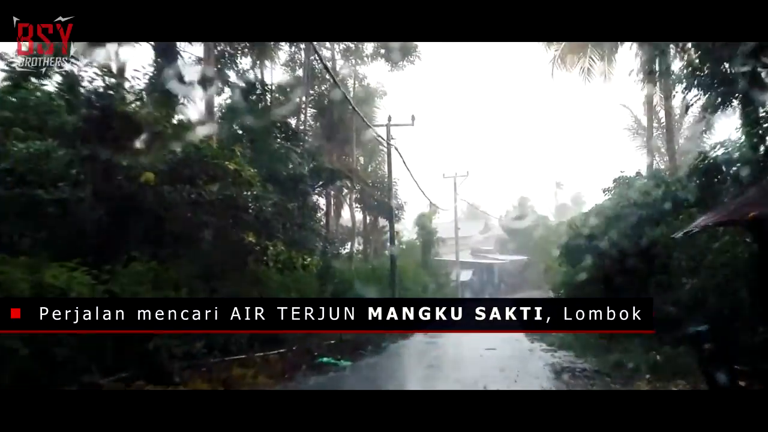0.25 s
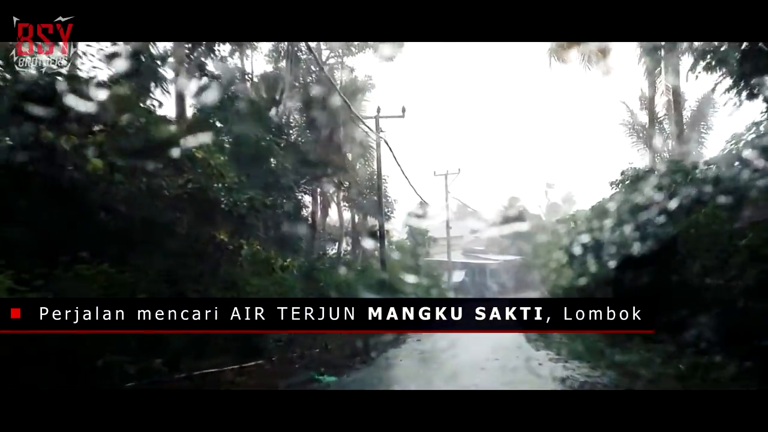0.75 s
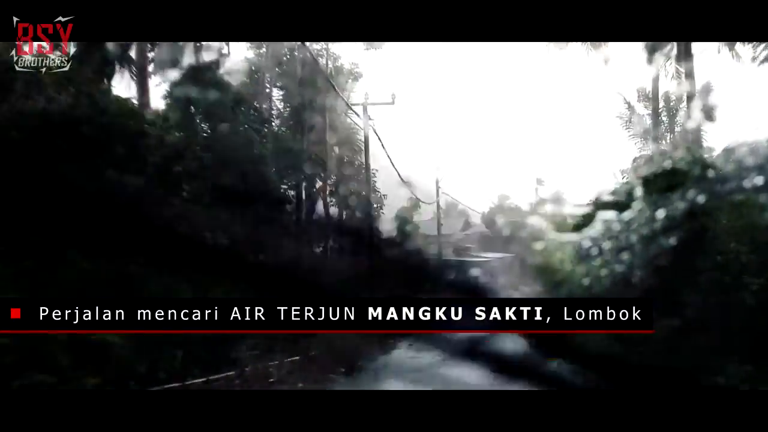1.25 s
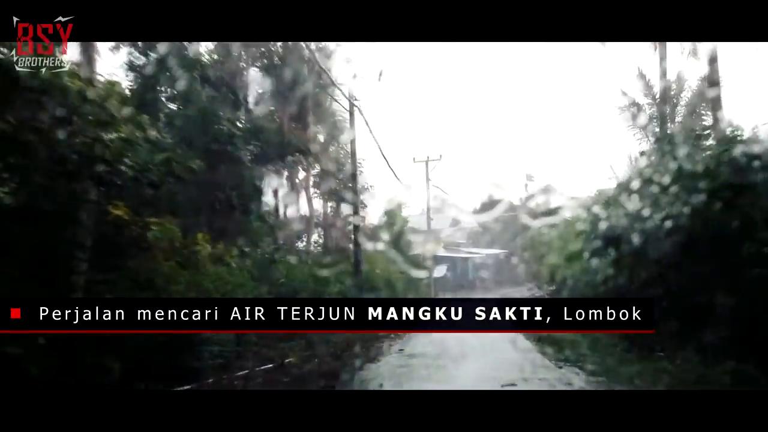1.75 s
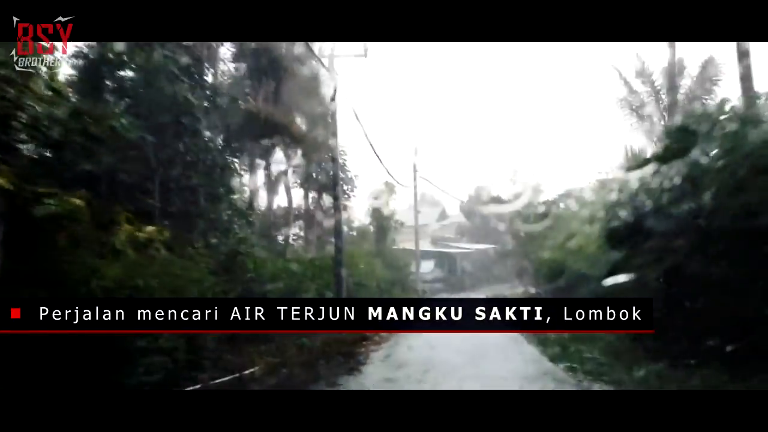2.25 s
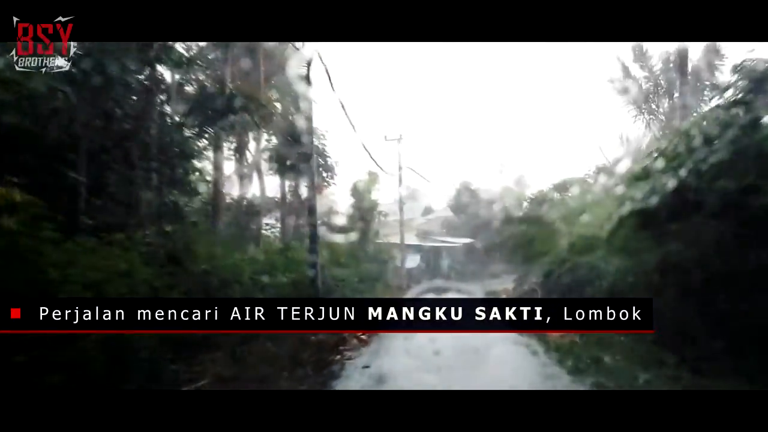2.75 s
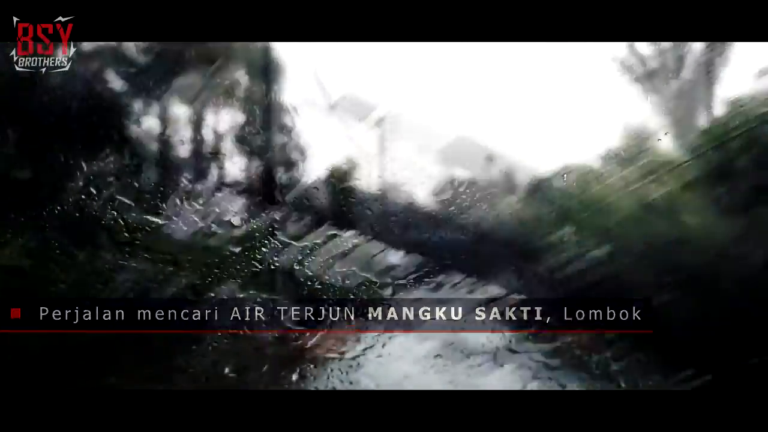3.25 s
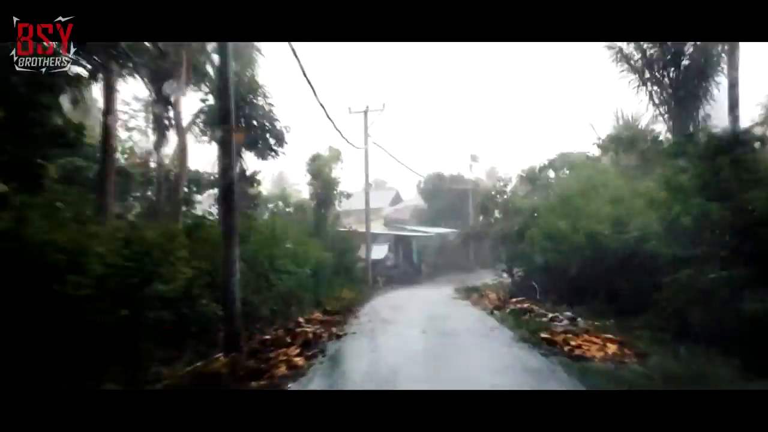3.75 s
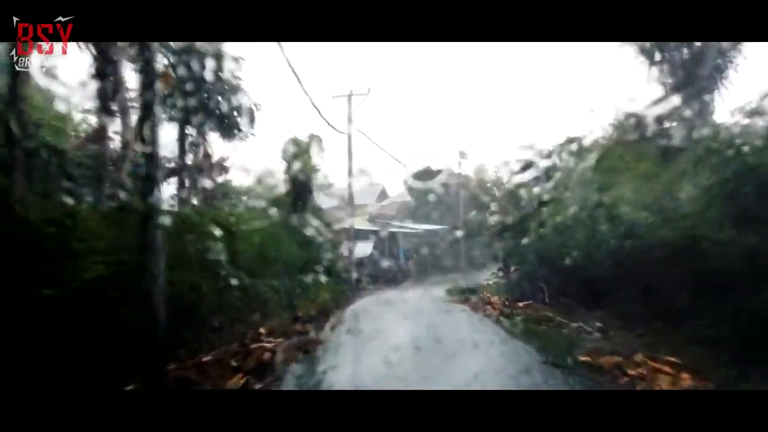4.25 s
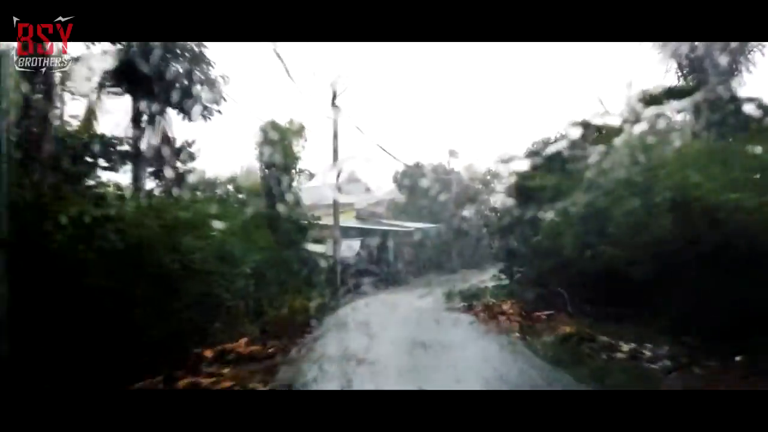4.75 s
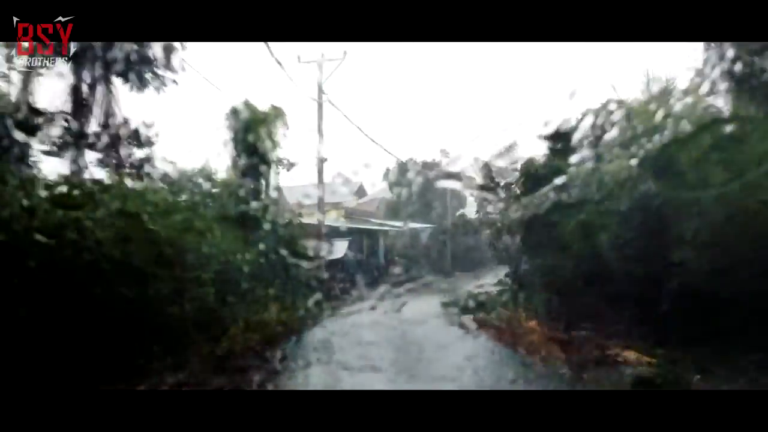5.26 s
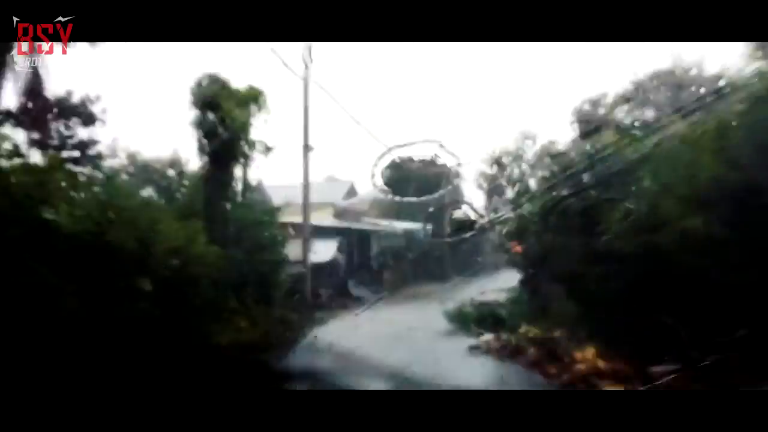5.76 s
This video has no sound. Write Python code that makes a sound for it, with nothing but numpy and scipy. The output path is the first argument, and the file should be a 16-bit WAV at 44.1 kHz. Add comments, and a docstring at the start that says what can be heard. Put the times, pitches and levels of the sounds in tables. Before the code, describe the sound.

Heavy rain patters on a slowly moving car's windshield and roof, heard from inside over road rumble, engine hum and thudding wipers.

```python
"""Slow drive in heavy rain

Inside a small car on a wet lane, countless drops patter on the windshield and roof. They thin out
under a tree, which sheds a few fat drips. The bumpy road rumbles through the body, the engine
pulls and eases off, and the wipers thud at each turn."""
import sys
import numpy as np
from scipy import signal
from scipy.fft import rfft, irfft
from scipy.io import wavfile
from scipy.ndimage import uniform_filter1d

SR = 44100
rng = np.random.default_rng(int(sys.argv[2]) if len(sys.argv) > 2 else 0)


def dump(signal):
    """Clip the signal to [-1, 1] and save it as 16-bit WAV at the path in sys.argv[1]."""
    limited = np.clip(np.atleast_2d(signal).T, -1, 1)
    pcm = np.round(limited * 32767).astype(np.int16)
    wavfile.write(sys.argv[1], SR, pcm)


N = 264820
TIME = np.arange(N) / SR
FREQS = np.fft.rfftfreq(N, 1 / SR)


def amp(db):
    """Turns decibels into a number to multiply by."""
    return 10 ** (np.asarray(db) / 20)


def unit(x):
    """Scales a signal to an average strength (rms) of 1."""
    return x / np.sqrt(np.mean(x ** 2) + 1e-20)


def at_pitch(points, hz):
    """Reads a table at the given frequencies, on a scale of octaves."""
    f, value = np.transpose(points)
    return np.interp(np.log(hz + 1), np.log(f), value)


def in_time(rows):
    """Turns each column after the time into a curve with a value for every sample."""
    s, *columns = np.transpose(rows)
    return [np.interp(TIME, s, column) for column in columns]


def swell(s, half_length):
    """A bell-shaped rise and fall around time s."""
    return np.exp(-.5 * ((TIME - s) / half_length) ** 2)


def hump(centre_hz, octaves):
    """A bell shape that picks out the frequencies around one pitch."""
    return np.exp(-.5 * (np.log2((FREQS + 1) / centre_hz) / octaves) ** 2)


def drift(hz):
    """A smooth random wander, up to about hz wiggles a second."""
    slow = np.exp(-(FREQS / hz) ** 2) * (FREQS > 0)
    return unit(irfft(rfft(rng.standard_normal(N)) * slow, N))


def add(mix, s, sound):
    """Mixes a sound in at time s."""
    part = mix[:, max(round(s * SR), 0):][:, :sound.shape[1]]
    part += sound[:, :part.shape[1]]


def ring(x, tone_db):
    """Gives a sound the tone of a panel, so that each click rings briefly."""
    cepstrum = irfft(np.log(amp(np.maximum(tone_db, -100))), N)
    # folding this in half makes the ring come after the click, never before
    cepstrum[..., 1:N // 2] *= 2
    cepstrum[..., N // 2 + 1:] = 0
    return irfft(rfft(x) * np.exp(rfft(cepstrum)), N)


# how alike left and right sound: f/Hz, likeness (1 = the same, 0 = unrelated, -1 = opposite)
SIDE_LIKENESS = [(35, .9995), (80, .997), (130, .988), (190, .972), (300, .86), (430, .1), (570, .72),
                 (800, -.21), (960, .14), (1250, -.23), (1600, -.47), (1900, .23), (2500, .24),
                 (3000, -.29), (3700, 0)]
def cabin(pair):
    """Blends two signals: long waves reach both sides alike, shorter ones stand across the cabin."""
    angle = np.arcsin(np.clip(at_pitch(SIDE_LIKENESS, FREQS), -1, 1)) / 2
    spectra = rfft(pair)
    return irfft(np.cos(angle) * spectra + np.sin(angle) * spectra[::-1], N)


def cabin_noise(tone):
    """Steady noise that fills the cabin with the given tone."""
    return unit(ring(cabin(rng.standard_normal((2, N))), at_pitch(tone, FREQS)))


# how hard it rains: t/s, level/dB
SHOWER = [(0, -37.5), (.8, -37), (1.6, -37), (2.1, -35), (2.75, -34.5), (3.1, -35.5), (3.6, -34.5),
          (4.28, -35), (4.5, -33), (4.9, -33.5), (5.25, -31.5), (5.7, -34), (6, -36)]
# trees that shelter the passing car: t/s, rain held off/dB, half length/s
SHELTER = [(0.018, 1.3, 0.11), (3.83, 7.6, 0.088), (4.1, 5, 0.042), (4.2, 2, .04), (4.27, 2, .018),
           (6.0, 2, 0.082)]
def rain_level():
    """The rain that reaches the car, in dB: the shower less what the trees hold off."""
    shower_db, = in_time(SHOWER)
    return shower_db - sum(db * swell(s, half_length) for s, db, half_length in SHELTER)


def rain_change():
    """How far the rain is above or below its average, in dB."""
    rain_db = rain_level()
    return rain_db - rain_db.mean()


def impacts(per_s, spread_db, largest):
    """Drops land at random as single clicks: many small ones and a few large."""
    size = amp(spread_db * np.minimum(rng.exponential(1, (2, N)), largest))
    sign = rng.choice([-1, 1], (2, N))
    lands = rng.random((2, N)) < per_s / SR
    return size * sign * lands


def shimmer(x, depth_db, bins, frames=7):
    """Makes the tone flicker, most in the treble, in random patches `bins` high and `frames` long."""
    window = dict(fs=SR, nperseg=1024, noverlap=768)
    hz, _, spectra = signal.stft(x, **window)
    patches = uniform_filter1d(rng.standard_normal(spectra.shape[1:]), bins, axis=0)
    patches = unit(uniform_filter1d(patches, frames, axis=1))
    treble = at_pitch([(1000, 0.54), (9000, 0.69)], hz)[:, None]
    flicker = amp(depth_db * treble * np.minimum(patches, 1))
    return signal.istft(spectra * flicker, **window)[1][:, :N]


# how much louder the rain is on the left: f/Hz, left minus right/dB
RAIN_BALANCE = [(300, 0), (580, -1.5), (710, -6), (850, 0), (1300, -1), (1500, -1.5), (2300, -0.5),
                (3100, -3), (4300, -.5), (7000, -4), (8200, -1.5), (9500, 5), (12000, -1), (15300, -8.5)]
def panel(tone, ripple_db=1.1, spacing_hz=70):
    """A panel's tone in dB, left and right, made uneven by the many notes it can ring at."""
    notes_hz = np.arange(400) * spacing_hz
    ripple = np.array([np.interp(FREQS, notes_hz, side) for side in rng.standard_normal((2, 400))])
    ripple *= ripple_db * hump(2800, octaves=0.9)  # higher notes overlap and even out
    balance = np.outer([.5, -.5], at_pitch(RAIN_BALANCE, FREQS))
    return at_pitch(tone, FREQS) + balance + ripple


# tone of rain on glass: f/Hz, level/dB
GLASS_TONE = [(300, -9.5), (900, -12.5), (1400, 3), (2000, -1.5), (3000, 0), (4200, -1), (5200, -5),
              (7200, -2.5), (8300, -4.5), (9300, -6), (10500, -12), (12000, -16.5), (13500, -16),
              (15500, -15)]
def windshield(drops_per_s=5000, wash_db=-6, level_db=3.5, sizzle=0.14, band_count=14):
    """Each drop ticks in its own range of pitch; echoes and tiny drops merge into a wash."""
    bands = np.array([hump(hz, octaves=1) for hz in np.geomspace(1000, 14000, band_count)]) + 1e-9
    bands /= np.linalg.norm(bands, axis=0)  # together they cover all pitches evenly
    per_band = drops_per_s / band_count
    tick_spectrum = sum(band * rfft(impacts(per_band, spread_db=.5, largest=5.1)) for band in bands)
    patter = unit(irfft(tick_spectrum, N)) + amp(wash_db) * rng.standard_normal((2, N))
    patter = shimmer(patter, depth_db=6, bins=6)
    patter = shimmer(patter, depth_db=1.5, bins=110)
    patter = unit(ring(cabin(patter), panel(GLASS_TONE)))
    fizz = irfft(rfft(patter) * hump(6000, octaves=0.8), N)
    patter += np.tanh(sizzle * rain_change() / 2) * fizz / 2  # harder rain splashes brighter
    return amp(rain_level() + level_db) * patter


# tone of larger drops on glass: f/Hz, level/dB
TAP_TONE = [(250, -5), (700, 0), (1020, 2), (1230, -6), (1400, -4.5), (2000, -1.5), (3500, -0.5),
            (9000, -16.5), (13000, -25)]
def taps(drops_per_s=130, ring_s=0.002, level_db=-6.5, spot_count=12):
    """Larger drops stand out of the patter; each spot of glass they hit rings in its own way."""
    t = TIME[:SR // 50]
    spots = rng.standard_normal((spot_count, 2, len(t))) * np.exp(-t / ring_s)
    hits = np.zeros((2, N))
    for spot in spots:
        drops = impacts(drops_per_s / spot_count, spread_db=1.5, largest=2.9)
        hits += signal.oaconvolve(drops, spot, axes=1)[:, :N]
    return amp(rain_level() + level_db) * unit(ring(cabin(hits), at_pitch(TAP_TONE, FREQS)))


# tone of rain on the roof: f/Hz, level/dB
ROOF_TONE = [(120, -1), (230, 4.5), (330, 1), (390, 3), (440, 3), (580, 2.5), (650, 2), (720, 4),
             (820, -0.5), (1020, 1), (1230, -8.5), (1500, -6.5), (2200, -12), (5000, -37)]
def roof(drops_per_s=2200, level_db=-34, rain_share=0.63):
    """Drops drum on the sheet metal, dulled by the roof lining."""
    drops = impacts(drops_per_s, spread_db=3, largest=2.7)
    drumming = unit(ring(cabin(drops), panel(ROOF_TONE)))
    return amp(level_db + rain_share * rain_change()) * drumming


# tone of the shaking car body: f/Hz, level/dB
RUMBLE_TONE = [(10, -35), (19, -11), (27, 2.5), (38, 0), (51, 4.5), (62, -0.5), (75, -4), (97, -7),
               (125, -15.5), (200, -21), (450, -45), (1200, -87)]
# tone of the rolling tyres: f/Hz, level/dB
TYRE_TONE = [(70, -29), (110, -2), (150, -2), (195, 0), (225, -1), (245, -2), (265, -4), (300, -6.5),
             (350, -15), (500, -27.5), (1200, -45)]
def road(rise_db_per_s=0.9, rain_share=0.48):
    """The lane grows rougher and shakes the car; the tyres roar, more on bumps and where it is wet."""
    rumble_db = -28 + rise_db_per_s * TIME
    tyres_db = -34.5 + rain_share * rain_change()
    for s, extra_rumble_db, extra_tyres_db, _, _ in LANE_BUMPS:  # listed above jolts()
        bump = swell(s, BUMP_HALF_S)
        rumble_db += extra_rumble_db * bump
        tyres_db += extra_tyres_db * bump
    rumble = amp(rumble_db) * cabin_noise(RUMBLE_TONE)
    tyres = amp(tyres_db) * cabin_noise(TYRE_TONE)
    return rumble + tyres * amp([[-.4], [.4]])  # a little louder on the right


# the engine pulls, eases off and rolls on: t/s, firing rate/Hz, level/dB
ENGINE_RUN = [(0, 61.5, -41), (.7, 64.93, -38), (.98, 70, -34), (1.18, 74.5, -28), (1.57, 79.6, -34),
              (1.8, 82.5, -34.5), (1.87, 83.3, -30.5), (1.98, 85, -32), (2.03, 87.5, -39),
              (2.35, 93.4, -33.5), (2.8, 98, -35), (3.0, 88, -39), (3.08, 83.5, -35), (3.17, 80, -29),
              (3.27, 75, -37), (3.7, 70.9, -32), (4.3, 71, -34), (4.6, 71.4, -37), (5.15, 74.35, -44),
              (6, 70.6, -46)]
# the notes in its hum: multiple of the firing rate, level/dB
HARMONICS = [(1, 1.5), (2, -9.5), (3, -14.5), (4, -20), (5, -26)]
# pitches at which the cabin booms: f/Hz, width/Hz, boost/dB
CABIN_BOOMS = [(152, 14, 7), (166, 12, 11.5), (231, 16, 12), (392, 30, 13)]
def engine(wobble=0.0035, flutter_db=1.0, left_lag_s=0.00006):
    """The firing engine hums a stack of notes; each swells as it passes a boom of the cabin."""
    firing_hz, load_db = in_time(ENGINE_RUN)
    cycles = np.cumsum(firing_hz * (1 + wobble * drift(14))) / SR
    cycles = cycles - np.outer([left_lag_s, 0], firing_hz)
    hum = np.zeros((2, N))
    for multiple, db in HARMONICS:
        note_hz = multiple * firing_hz
        boom_db = sum(boost / (1 + (2 * (note_hz - hz) / width) ** 2)
                      for hz, width, boost in CABIN_BOOMS)
        loudness = amp(load_db + db + boom_db + flutter_db * drift(5.4))
        hum += loudness * np.sin(2 * np.pi * (multiple * cycles + rng.random()))
    return np.sqrt(2) * hum


# tone of a wiper's thud: f/Hz, level/dB
THUD_TONE = [(40, -26), (80, 2.5), (130, 0.5), (180, -3), (250, -7), (370, -14), (480, -14.5), (800, -45),
             (2000, -62)]
# a hard landing at the foot of the glass, then a soft turn at the top: level/dB, half length/s
WIPER_TURNS = [(-24, 0.03), (-27.5, 0.056)]
def wipers(sweep_s=.604, flop_lag_s=0.013):
    """The rubber blades flop over with a thud just after each end of their sweep."""
    loudness = np.zeros(N)
    for turn, s in enumerate(np.arange(0, N / SR, sweep_s)):
        db, half_length = WIPER_TURNS[turn % 2]
        loudness += amp(db) * swell(s + flop_lag_s, half_length)
    return loudness * cabin_noise(THUD_TONE)


# knocks of the rods that move the wipers: t/s, level/dB
ROD_KNOCKS = [(0, -22), (1.205, -20.3), (2.405, -19.7), (3.62, -20.3), (4.829, -25)]
# notes of the wall behind the dashboard: f/Hz, level/dB, time to fade by 60 dB/s
WALL_NOTES = [(124, -3.5, 0.09), (191, -7, 0.04), (300, -8, 0.082), (360, -3.5, 0.075), (450, -8, 0.046)]
def knocks(rise_s=0.0023):
    """At the foot of the glass the wiper rods take up their slack and knock on the cabin's front wall."""
    out, t = np.zeros((2, N)), TIME[:SR // 4]
    knock = sum(amp(db - 60 * t / fade_s) * np.sin(2 * np.pi * hz * t) for hz, db, fade_s in WALL_NOTES)
    knock *= 1 - np.exp(-t / rise_s)  # rubber mounts soften the blow
    for s, db in ROD_KNOCKS:
        add(out, s, amp(db) * knock[None])
    return out


SPLASH_SAMPLES = 8192
def splash(low_hz, high_hz):
    """A short hiss of bursting water, mostly between two frequencies."""
    hz = np.fft.rfftfreq(SPLASH_SAMPLES, 1 / SR) + 1
    band = 1 / np.sqrt((1 + (low_hz / hz) ** 4) * (1 + (hz / high_hz) ** 8))
    return unit(irfft(rfft(rng.standard_normal((2, SPLASH_SAMPLES))) * band))


# fat drips on the glass: t/s, level/dB, lowest f/Hz, highest f/Hz
FAT_DRIPS = [(.2363, -27.5, 1200, 6000), (.259, -29.5, 800, 4000), (.5392, -29.5, 5500, 9000),
             (.81, -25.3, 2200, 7000), (1.0315, -29.5, 1500, 7000), (1.1255, -27, 1300, 5500),
             (1.446, -30, 1000, 4500), (1.9826, -25.5, 3000, 10000), (2.742, -27.5, 1000, 7000),
             (2.819, -28, 2000, 5000), (3.3523, -27, 1500, 7000), (4.0262, -20.3, 1000, 4300),
             (4.0596, -31, 800, 5000), (4.1132, -21.8, 1500, 7500), (4.1417, -23.7, 1200, 5200),
             (4.1692, -19, 1400, 5000), (4.1937, -26, 1000, 5000), (4.2367, -24, 2200, 7500),
             (4.2196, -28, 800, 5000), (4.3228, -28.5, 1600, 5000), (4.7374, -26.5, 2000, 5500),
             (4.9467, -25, 950, 5000), (5.045, -26.5, 2000, 7000), (5.1844, -24, 1500, 6000),
             (5.7006, -27, 900, 6500)]
def drips(flatten_s=.0009, smack_s=.0025, echo_s=0.013, flex_ratio=1.5, flex_db=-9.5):
    """Fat drips smack the glass and flex it with a knock; the cabin echoes briefly."""
    out = np.zeros((2, N))
    smack = swell(flatten_s, flatten_s / 2)
    echo = amp(-23) * (1 - np.exp(-TIME / flatten_s)) * np.exp(-TIME / echo_s)
    splatter = amp(-16) * swell(.0065, half_length=.0034)  # flung droplets land just after
    loudness = (smack + echo + splatter)[:SPLASH_SAMPLES]
    for s, db, low_hz, high_hz in FAT_DRIPS:
        flex = smack * np.sin(2 * np.pi * flex_ratio * low_hz * (TIME - flatten_s))
        hit = splash(low_hz, high_hz) * loudness + amp(flex_db) * flex[:SPLASH_SAMPLES]
        smack_strength = hit[:, :round(smack_s * SR)].std()
        add(out, s, amp(db) * hit / smack_strength)
    return out * amp([[-.75], [.75]])  # louder on the right


# bursts of spray at their peak: t/s, level/dB, lowest f/Hz, highest f/Hz, rise time/s
SPRAY_BURSTS = [(0.814, -30, 1500, 12000, 0.01), (1.138, -43, 1010, 8040, 0.011),
                (1.215, -35.5, 3500, 11800, 0.023), (1.984, -34, 8000, 13000, 0.0043),
                (4.245, -29, 3000, 9000, .004), (4.956, -32, 950, 5000, .009)]
def spray():
    """Clusters of droplets burst on the glass with a short hiss."""
    out = np.zeros((2, N))
    for s, db, low_hz, high_hz, rise_s in SPRAY_BURSTS:
        age = TIME[:SPLASH_SAMPLES] / rise_s
        loudness = age ** 2 * np.exp(2 - 2 * age)  # peaks when age is 1
        add(out, s - rise_s, amp(db) * splash(low_hz, high_hz) * loudness)
    return out


BUMP_HALF_S = 0.069  # half length of the shudder from a bump
# bumps in the lane: t/s, extra rumble/dB, extra tyre roar/dB, boom level/dB, boom f/Hz
LANE_BUMPS = [(1.93, 2.5, 1, -22.5, 52), (2.33, 1, 3, -31, 53), (2.85, 2, 4, -28, 35),
              (3.82, 1.5, 0, -22, 27), (4.15, 3.5, 1.5, -22.5, 52), (4.68, 1, 1, -20.5, 47),
              (4.86, 2, 2.5, -24, 66), (5.17, 0, 0, -26, 52), (5.49, 0, 2.5, -21, 50),
              (5.93, 1.5, 1.5, -19.5, 44)]
def jolts(wobble=0.037):
    """Each bump sets the car body booming for a few cycles."""
    unsteady_time = np.cumsum(1 + wobble * drift(16.5)) / SR
    out = np.zeros(N)
    for s, _, _, db, hz in LANE_BUMPS:
        boom = np.sin(2 * np.pi * (hz * unsteady_time + rng.random()))
        out += amp(db) * swell(s, BUMP_HALF_S) * boom
    return np.sqrt(2) * out


# a brief drone in the cabin: t/s, f/Hz, level/dB
DRONE_NOTE = [(4.9, 232, -90), (5.2, 228, -38), (5.35, 223, -36), (5.45, 220, -30.5), (5.55, 220, -42),
              (5.8, 220, -90)]
def drone(wobble=0.0075, flutter_db=2):
    """A low, slightly sinking note swells and fades near the end."""
    hz, db = in_time(DRONE_NOTE)
    cycles = np.cumsum(hz * (1 + wobble * drift(20))) / SR
    return np.sqrt(2) * amp(db + flutter_db * drift(7.5)) * np.sin(2 * np.pi * cycles)


def scene(clump_db=.65, clump_hz=32):
    """Rain on glass and roof, arriving in clumps, over the sounds of the moving car."""
    car = road() + jolts() + engine() + drone() + wipers() + knocks()
    car *= amp([[-.15], [.15]])  # a touch louder on the right
    rain = windshield() + taps() + roof()
    rain *= amp(clump_db * drift(clump_hz))
    return rain + drips() + spray() + car


def record(dry, cutoff_hz=15720):
    """Cuts away the very highest treble."""
    lowpass = signal.firwin(511, cutoff_hz, window=("kaiser", 9), fs=SR)
    return signal.oaconvolve(dry, lowpass[None], "same")


dry = scene()
out = record(dry)
dump(out)
```